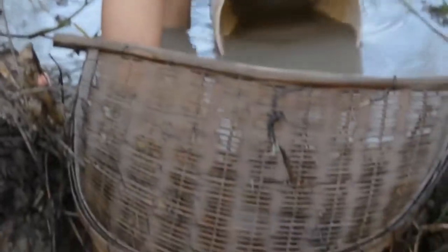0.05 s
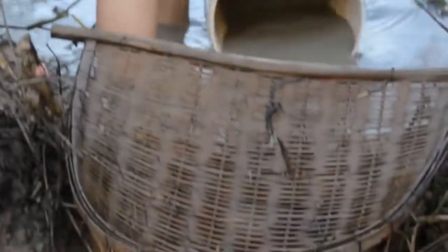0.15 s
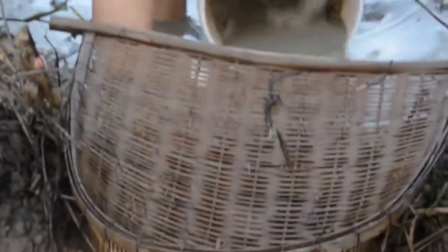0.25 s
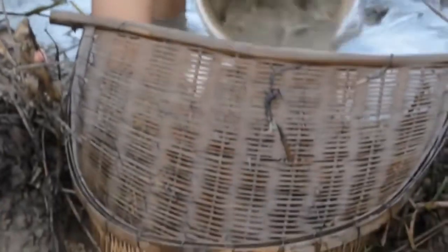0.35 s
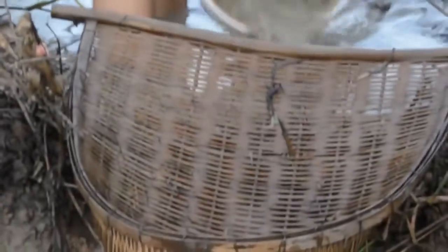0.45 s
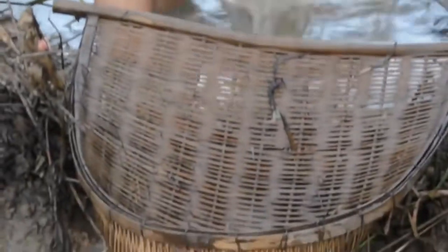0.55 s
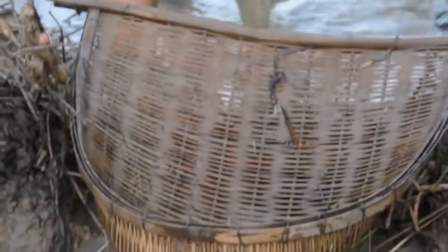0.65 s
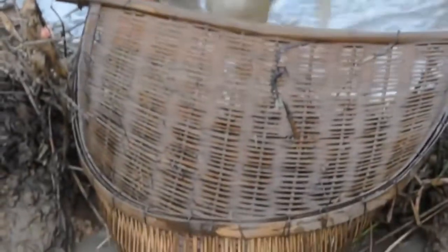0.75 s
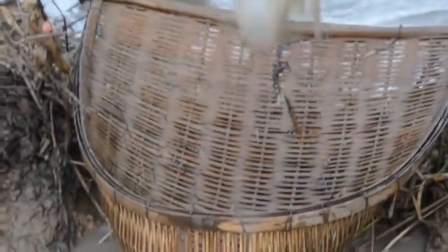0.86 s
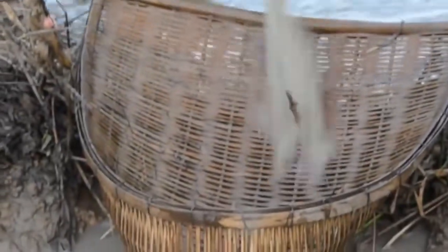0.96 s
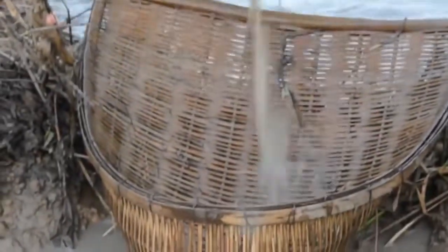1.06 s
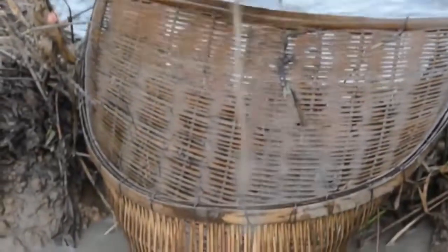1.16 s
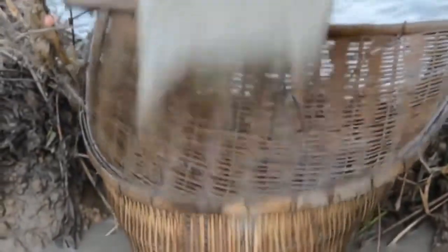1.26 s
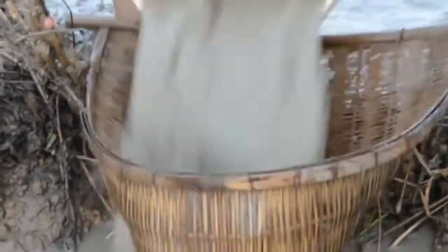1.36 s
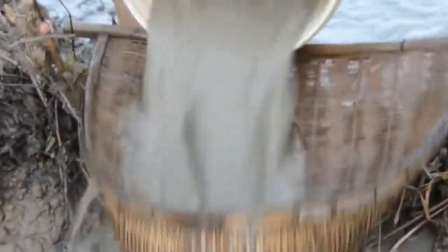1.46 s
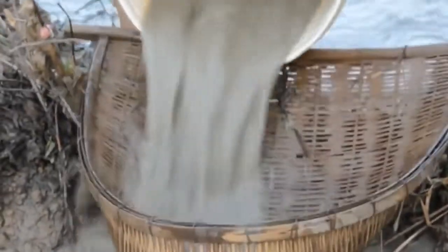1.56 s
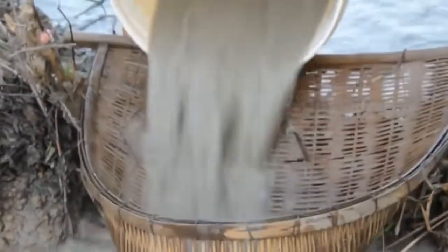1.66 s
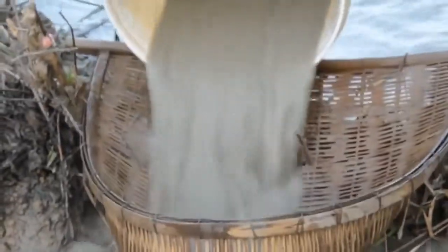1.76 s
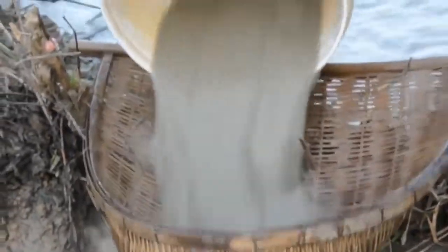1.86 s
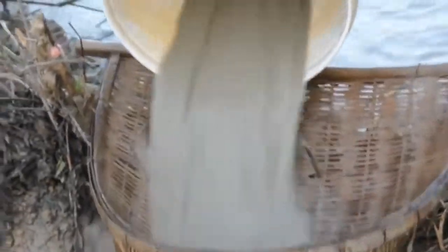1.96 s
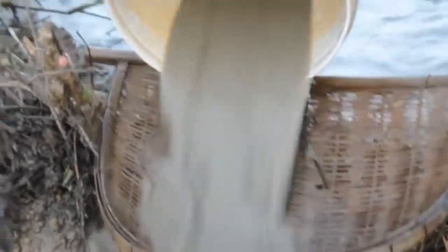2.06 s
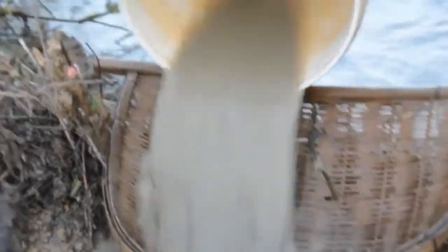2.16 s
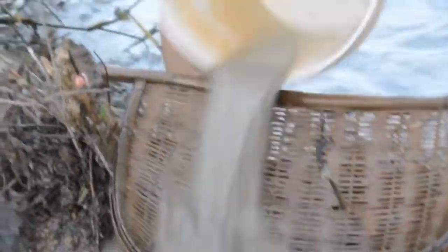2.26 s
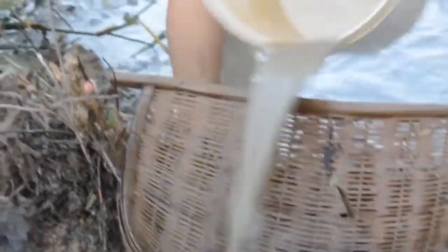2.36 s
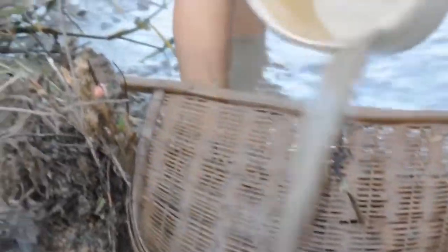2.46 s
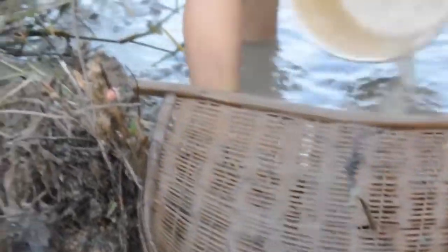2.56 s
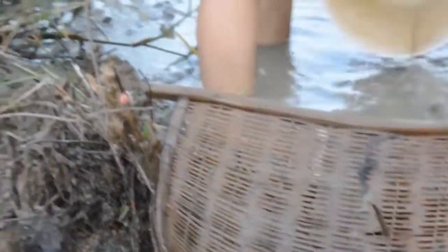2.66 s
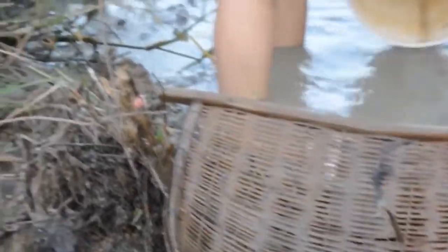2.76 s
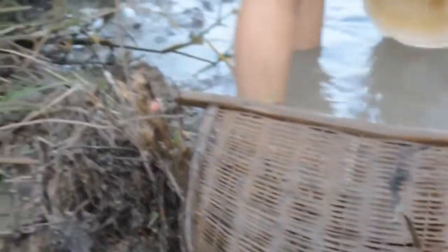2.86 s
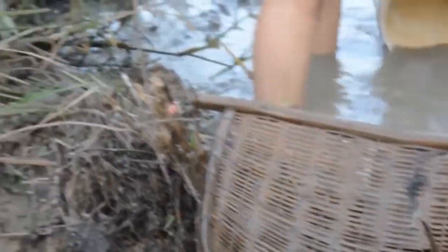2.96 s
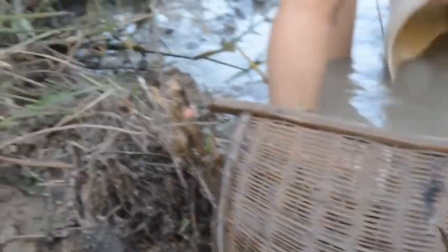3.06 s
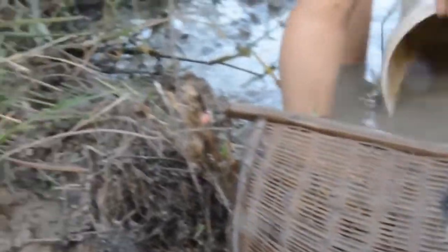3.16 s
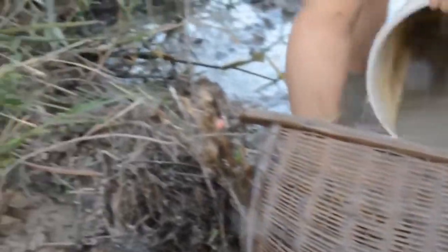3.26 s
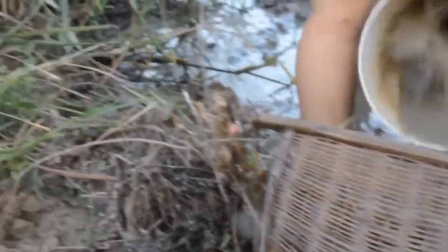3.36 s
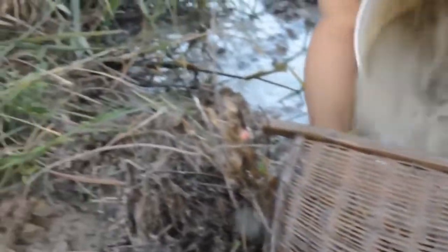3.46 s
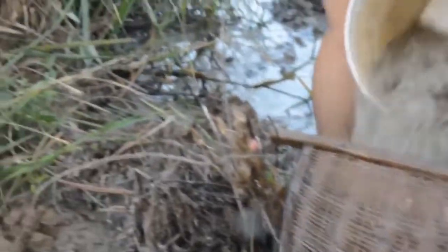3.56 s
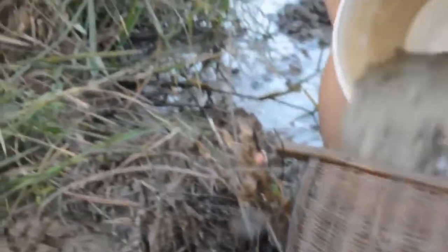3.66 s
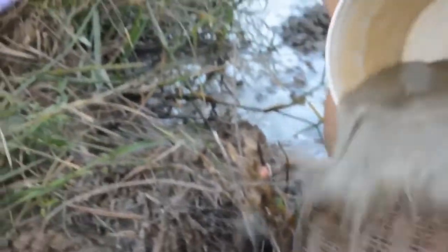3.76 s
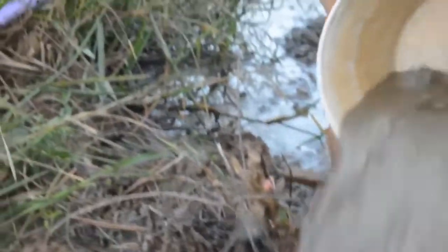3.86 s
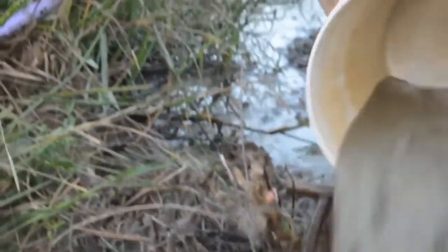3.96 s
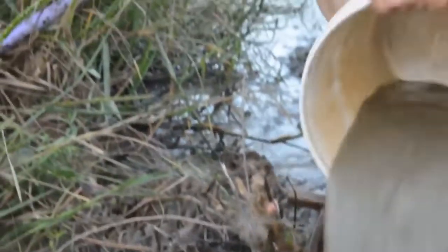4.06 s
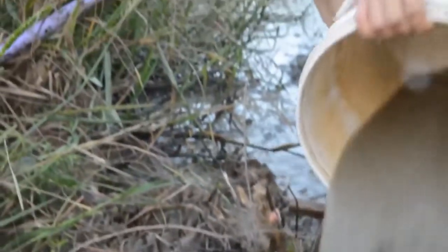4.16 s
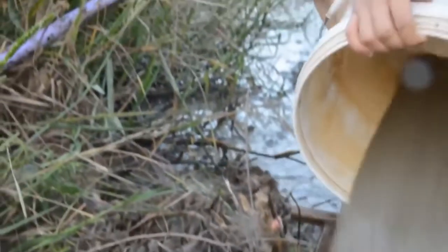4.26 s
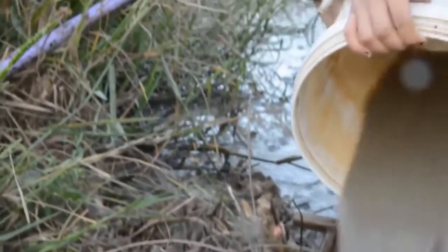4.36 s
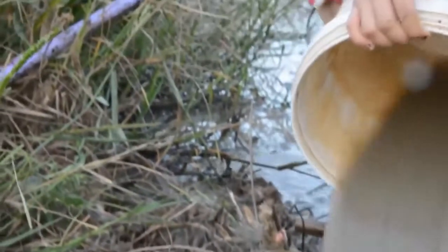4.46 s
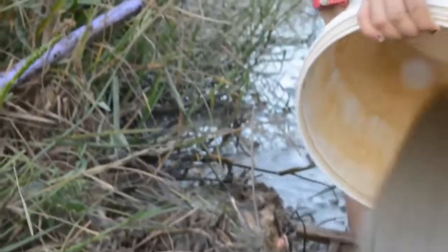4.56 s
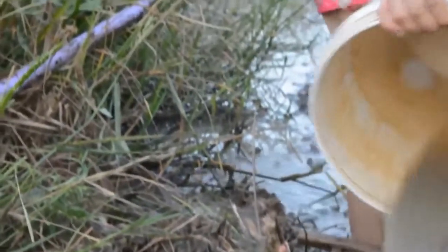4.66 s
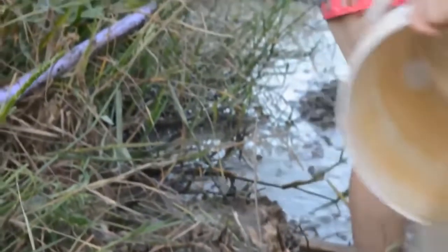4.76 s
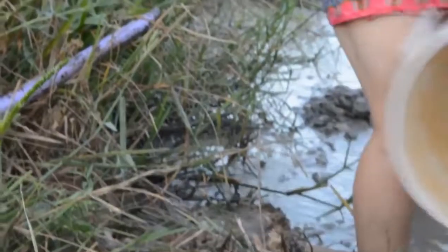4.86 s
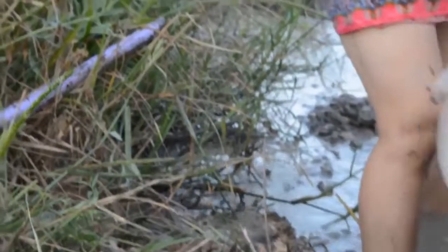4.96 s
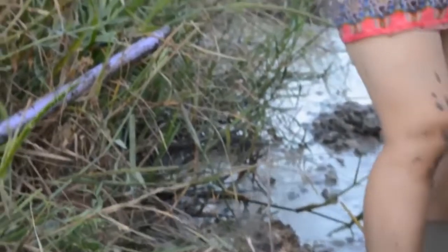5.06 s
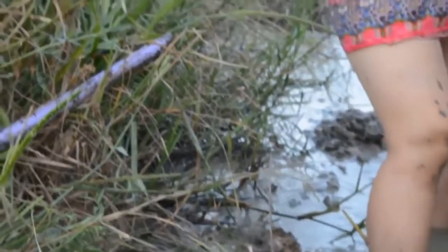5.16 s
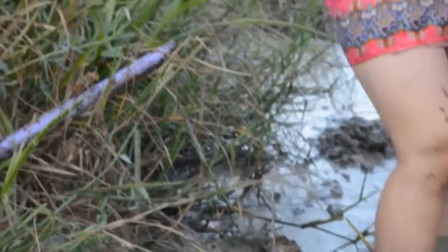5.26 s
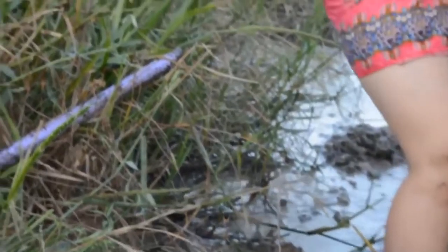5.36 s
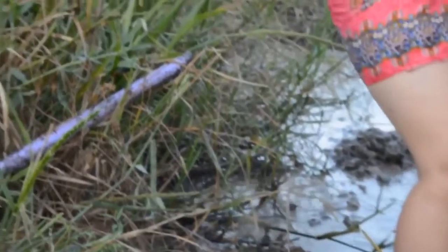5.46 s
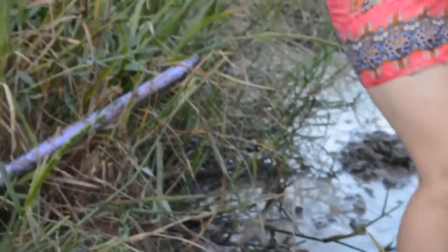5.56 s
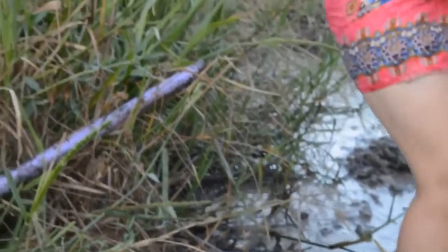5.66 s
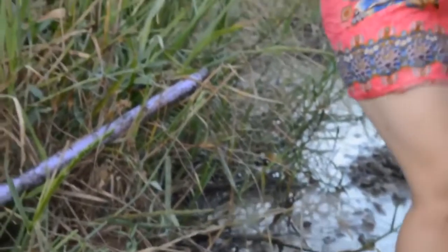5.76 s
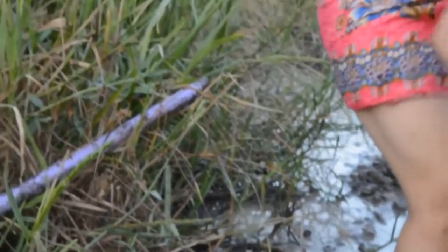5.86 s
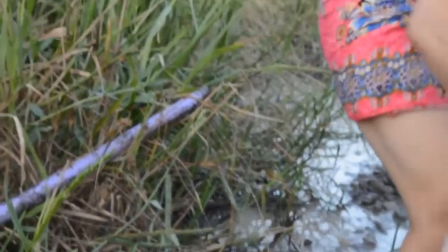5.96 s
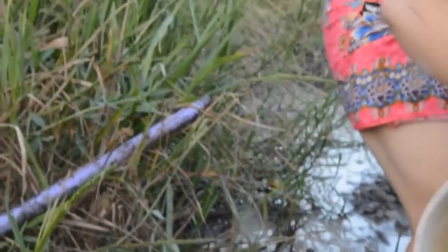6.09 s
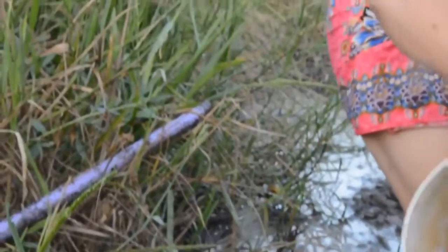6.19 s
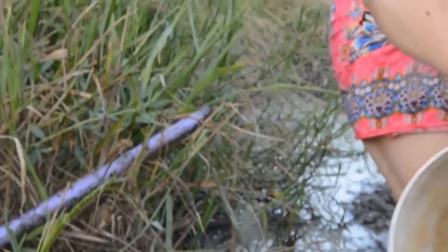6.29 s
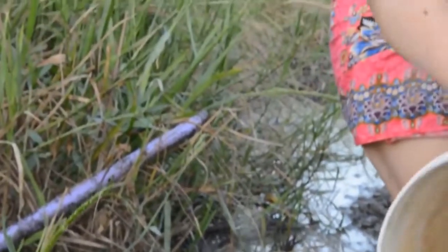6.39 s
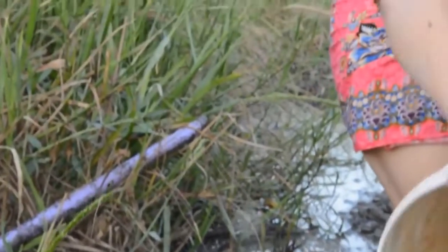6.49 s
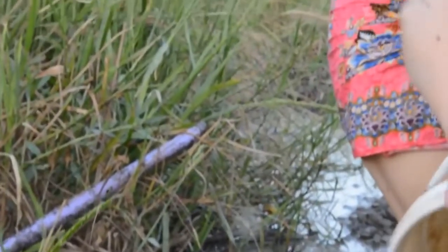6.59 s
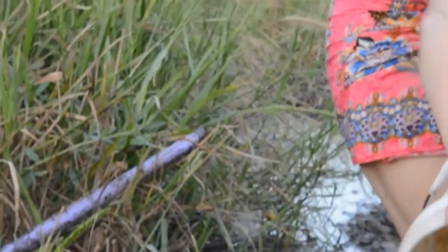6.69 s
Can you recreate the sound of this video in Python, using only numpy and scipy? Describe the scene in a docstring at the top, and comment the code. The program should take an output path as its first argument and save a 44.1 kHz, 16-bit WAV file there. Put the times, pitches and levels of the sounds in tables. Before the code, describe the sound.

Close up outdoors, slightly left of centre, a bucket slaps and sloshes through shallow water, then tips a long splashing gush into a basket. Hollow plastic booms mark the emptying. A second scoop and heavier, bubbling pour follow, draining away to a quiet gap with soft mud steps before sloshing starts again. Thin insect shrilling and faint bird notes sit behind, in dry open air.

```python
"""Bailing a muddy pond

Someone bails a pond with a plastic bucket and pours it through a woven basket, close by and a little to the left.
The water is built from clouds of ringing bubbles over noise: scoops slap and gurgle, pours gush and drain away.
The bucket knocks with a hollow boom, made of fading tones that shift with the water in it.
Insects shrill in the grass, as noise and pure pulses, and a small bird twitters far off in short falling notes."""
import sys
import numpy as np
from scipy import signal
from scipy.fft import rfft, irfft, next_fast_len
from scipy.io import wavfile
from scipy.ndimage import map_coordinates

SR = 44100
rng = np.random.default_rng(int(sys.argv[2]) if len(sys.argv) > 2 else 0)


def log_audio(samples):
    """Write samples as a 16-bit WAV file to the path given in sys.argv[1]."""
    # one column per channel
    frames = np.atleast_2d(samples).T
    # limit to full scale, then quantise
    limited = np.clip(frames, -1, 1)
    pcm = np.round(limited * 32767).astype(np.int16)
    wavfile.write(sys.argv[1], SR, pcm)


N = 296793  # length of the scene in samples


def amp(db):
    """Turn a level in dB into a gain."""
    return 10 ** (np.asarray(db) / 20)


def unit(x):
    """Scale x to an average (rms) level of 1."""
    return x / np.sqrt(np.mean(x ** 2) + 1e-20)


def along(points, hz):
    """Read a curve of (f/Hz, value) points, joined by straight lines on a log pitch axis."""
    f, v = np.transpose(points)
    return np.interp(np.log(hz + 1), np.log(f + 1), v)


def wobble(rate):
    """A smooth random curve with a new random value rate times a second."""
    return map_coordinates(rng.standard_normal(int(N * rate / SR) + 4), [np.arange(N) * rate / SR])


def filtered(x, response):
    """Change the loudness of each pitch in x by a gain that depends on frequency."""
    m = next_fast_len(N + SR // 2)
    gain = response(np.fft.rfftfreq(m, 1 / SR))
    return irfft(rfft(x, m) * gain, m)[..., :N]


def coloured(x, spectrum):
    """Give x a tone colour with a filter of energy 1 that rings only after a click, never before."""
    size = 4096
    level_db = along(spectrum, np.fft.rfftfreq(size, 1 / SR))
    # folding the cepstrum moves all the ringing after the click (minimum phase)
    cepstrum = irfft(np.log(amp(level_db)))
    cepstrum[1:size // 2] *= 2
    cepstrum[size // 2 + 1:] = 0
    ringing = irfft(np.exp(rfft(cepstrum)))
    return signal.fftconvolve(x, ringing / np.linalg.norm(ringing))[:N]


def add(track, s, sound):
    """Mix a sound into a track, starting at s seconds."""
    start = max(round(s * SR), 0)
    part = track[start:start + len(sound)]
    part += sound[:len(part)]


def bubble(t, hz, cycles, rise):
    """A bubble swells over its first cycle and fades 60 dB in some more; its pitch climbs near the surface."""
    age = t * hz / cycles
    swell = 1 - np.exp(-(t * hz) ** 2)
    fade = np.exp(-np.log(1000) * age)
    return np.sin(2 * np.pi * hz * t * (1 + rise * age)) * fade * swell


def bubbles(count, low_hz, high_hz, cycles, scatter_db, size, rise=0.099):
    """A cloud of bubbles of random time, pitch, life and strength, each at most size samples long."""
    when, pitch, life, strength = rng.random((count, 4)).T[:, :, None]
    hz = low_hz * (high_hz / low_hz) ** pitch
    excess = -np.log(1 - .93 * strength)
    tones = bubble(np.arange(size) / SR, hz, cycles * (.5 + life), rise)
    rings = amp(scatter_db * excess) * hz * tones
    places = (when * N).astype(int) + np.arange(size)
    return unit(np.bincount(places.ravel(), rings.ravel(), N)[:N])


def voice(cloud, spectrum, bed_db):
    """Bubbles on a bed of noise, the rush of countless smaller ones, at rms 1."""
    bed = amp(bed_db) * rng.standard_normal(N)
    return unit(coloured(cloud + bed, spectrum))


def surge(s, rise, length, fall):
    """Power that swells up to time s, holds for a length and dies away; rise and fall each span 60 dB."""
    t = np.arange(N) / SR - s
    before, after = np.maximum(-t, 0), np.maximum(t - length, 0)
    return 1e-6 ** (before / rise + after / fall)


def powers(gurgle_db, splash_db, spray_db):
    """Power of the three voices of water, as rows."""
    return amp(np.vstack(np.broadcast_arrays(gurgle_db, splash_db, spray_db))) ** 2


# sloshes round the dipping bucket, before the trims in water():
# (t/s, length/s, splash level/dB, gurgle over splash/dB, spray over splash/dB)
SLOSHES = [(.075, 0.015, -51, -3, 2), (0.358, 0.092, -42.5, -4.5, 2.5), (0.47, 0.044, -34.5, -4.5, -10),
           (0.615, 0.087, -31.5, -9, -1.5), (0.728, 0.069, -33, -0.5, -0.5), (0.86, 0.15, -38, -22, -4.5),
           (2.952, 0.03, -40, -8, 2.5), (3.29, 0.13, -51, 1, -14), (3.468, .07, -37, -1, -1),
           (3.565, 0.068, -39, 7, 0), (5.558, .04, -41.5, 3, -2.5), (5.778, 0.1, -45.5, -3, -10),
           (5.95, 0.1, -35, 0, -0.5), (6.158, 0.08, -36, -5.5, -0.5), (6.232, 0.21, -30.5, -7, -3.5),
           (6.673, 0.023, -24.5, -17.5, -1.5)]
SLOSH_RISE_S, SLOSH_FALL_S = 0.23, 0.58  # time to swell and to die by 60 dB
LAP_DB, LAP_FALL_S = -11.5, 3.3  # the pond laps on after each slosh


def scooping():
    """Each dip of the bucket sloshes, then the pond laps and settles; returns power curves."""
    power = np.zeros((3, N))
    for s, length, db, gurgle_db, spray_db in SLOSHES:
        sloshing = surge(s, SLOSH_RISE_S, length, SLOSH_FALL_S)
        lapping = amp(LAP_DB) ** 2 * surge(s, SLOSH_RISE_S, length, LAP_FALL_S)
        power += powers(db + gurgle_db, db, db + spray_db) * (sloshing + lapping)
    return power


# streams poured into the basket, before thinning and the trims in water(): (t/s, length/s, splash level/dB)
POUR_STREAMS = [(1.783, 0.935, -29), (3.785, 0.12, -28.5), (4.083, 1.015, -28)]
POUR_RISE_S, POUR_FALL_S, POUR_SAG_DB_PER_S = 0.42, 0.63, 4  # the stream thins as the bucket empties
POUR_SPRAY_DB, POUR_GURGLE_DB = -1.5, -2.5  # over the splash
POOL_DB, POOL_S = 8.5, 0.19  # the gurgle starts this much weaker, until a pool has gathered
# gushes, when a mass of water tips out at once, before the trims in water():
# (t/s, rise/s, length/s, fall/s, splash level/dB, gurgle over splash/dB, spray over splash/dB)
GUSHES = [(1.749, 0.13, 0.021, 0.38, -22, -12, -2), (1.78, 0.14, 0.019, 0.22, -29, 3.5, -8),
          (2.837, 0.25, .006, 0.31, -33, -8, 0), (3.806, .15, 0.14, 0.39, -38, 3.5, 1),
          (4.321, 0.1, 0.11, 1.66, -25, -1.5, -2)]
# water hissing through the bare weave, before the trims in water():
# (t/s, rise/s, length/s, fall/s, spray level/dB)
HISSES = [(1.2, 0.54, 0.21, 0.7, -34), (1.673, 0.05, .07, 0.27, -25.5), (5.19, .5, 0.32, .5, -48)]
HISS_SPLASH_DB, HISS_GURGLE_DB = -10, -26  # over the spray


def pouring():
    """Streams gather a pool and slowly thin; gushes ride on them, and water hisses through the weave."""
    power = np.zeros((3, N))
    for s, length, db in POUR_STREAMS:
        age = np.maximum(np.arange(N) / SR - s, 0)
        flow_db = db - POUR_SAG_DB_PER_S * age
        gurgle_db = flow_db + POUR_GURGLE_DB - POOL_DB * np.exp(-age / POOL_S)
        flow = surge(s, POUR_RISE_S, length, POUR_FALL_S)
        power += powers(gurgle_db, flow_db, flow_db + POUR_SPRAY_DB) * flow
    for s, rise, length, fall, db, gurgle_db, spray_db in GUSHES:
        power += powers(db + gurgle_db, db, db + spray_db) * surge(s, rise, length, fall)
    for s, rise, length, fall, db in HISSES:
        power += powers(db + HISS_GURGLE_DB, db + HISS_SPLASH_DB, db) * surge(s, rise, length, fall)
    return power


# tone colours of the three voices of water, also used by slaps(): (f/Hz, relative level/dB)
GURGLE = [(70, -32), (140, -2.5), (300, -8), (680, 4.5), (850, 1.5), (1100, -2), (2000, -83.5)]
SPLASH = [(400, -61.5), (750, -5.5), (950, -1.5), (1500, 1.5), (2500, 0), (3700, -5.5), (4600, -22),
          (8000, -73)]
SPRAY = [(2000, -44.5), (3400, -3), (4200, 1), (6000, -1), (10000, -9.5), (13000, -15.5), (15800, -29.5)]
# tone colour of the slosh round the dipping bucket: (f/Hz, relative level/dB)
SLOSH = [(450, -41), (950, -8), (1550, -4.5), (2300, -4.5), (3700, -7.5), (6500, -46)]
# share of slosh in the splashing, the rest being falling stream (0-1)
DIP_SLOSH, POUR_SLOSH = 0.96, 0.31
STREAM_LUMPS_DB, SLOSH_LUMPS_DB = .85, 1.8  # size of the slower ups and downs in level


def water(scooped, poured):
    """Large bubbles gurgle, small ones splash and droplets spray; the flow's lumps drive all three."""
    power = scooped + poured + 1e-12
    gurgle_db, splash_db, spray_db = 10 * np.log10(power)
    dip = np.clip((DIP_SLOSH * scooped[1] + POUR_SLOSH * poured[1]) / power[1], 0, 1)
    lump_size = np.interp(dip, [POUR_SLOSH, DIP_SLOSH], [STREAM_LUMPS_DB, SLOSH_LUMPS_DB])
    lumps = lump_size * wobble(35) + 0.42 * wobble(220)
    large = bubbles(count=2400, low_hz=193.9, high_hz=1123, cycles=38.0, scatter_db=3.5, size=2000)
    gurgle = voice(large, GURGLE, bed_db=5.0)
    small = bubbles(count=6000, low_hz=750, high_hz=4500, cycles=24, scatter_db=4, size=800)
    stream = voice(small, SPLASH, bed_db=2.5)
    droplets = bubbles(count=9000, low_hz=3260, high_hz=14340, cycles=24, scatter_db=4.5, size=200)
    spray = voice(droplets, SPRAY, bed_db=6.5)
    # the dipping bucket traps fewer, longer-lived bubbles than the falling stream
    trapped = bubbles(count=2600, low_hz=746, high_hz=3804, cycles=54, scatter_db=-1.0, size=1600)
    slosh = voice(trapped, SLOSH, bed_db=8.0)
    # a few bubbles ring on long enough to be heard one by one
    blips = bubbles(count=120, low_hz=850, high_hz=2800, cycles=55, scatter_db=2.5, size=3000)
    splash = unit(np.sqrt(dip) * slosh + np.sqrt(1 - dip) * stream + (.2 + .2 * dip) * blips)
    # only a hard plunge traps the big, deep bubbles, so a weak gurgle loses some of its bass
    deep = filtered(gurgle, lambda hz: 1 / (1 + (hz / 450) ** 6))
    gurgle = gurgle + np.interp(gurgle_db, [-46, -28], [-.35, .3]) * deep
    out = amp(gurgle_db + lumps - 1.5) * gurgle
    out += amp(splash_db + lumps + 0.64) * splash
    out += amp(spray_db + lumps - 0.8) * spray
    return out


# tone colour of deep churn as water folds into the bucket: (f/Hz, relative level/dB)
CHURN = [(130, -29.5), (200, -5), (290, 1.5), (400, -2), (500, -21.5)]
CHURN_DB = -13  # over the gurgle power it is given


def churn(power):
    """Water folding over the sunken rim or plunging into the basket traps large, low bubbles."""
    cloud = bubbles(count=900, low_hz=180, high_hz=430, cycles=17, scatter_db=3, size=3000)
    return amp(CHURN_DB) * np.sqrt(power[0]) * voice(cloud, CHURN, bed_db=-9)


DRIP_DB, DRIP_FOLLOWS = -31, 0.38  # level at a slosh of 0 dB; dB gained for each dB of slosh


def drips(scooped):
    """Water runs off the bucket and drips into the pond in rising blips, which outlast the slosh."""
    cloud = bubbles(count=330, low_hz=520, high_hz=2200, cycles=36, scatter_db=3, size=3000, rise=.2)
    even = unit(filtered(cloud, lambda hz: 1 / np.hypot(1, hz / 700)))
    return amp(DRIP_DB) * scooped[1] ** (DRIP_FOLLOWS / 2) * even


# slaps of bucket and water: (t/s, time to fade 60 dB/s, splash level/dB, brightness/dB)
SLAPS = [(0.0218, 0.019, -16.5, -1.5), (0.069, 0.15, -37, -14), (0.227, 0.026, -30, 10),
         (0.233, 0.056, -28.5, -9), (0.354, 0.021, -16, -2.5), (0.3583, 0.04, -20.5, -3.5),
         (0.486, 0.0051, -17.5, 4.5), (0.491, 0.04, -20.5, -4), (0.768, 0.02, -27, 10.5),
         (1.544, 0.03, -21.5, -13), (1.726, 0.11, -27.5, 8), (2.37, 0.027, -19, -9),
         (2.454, 0.063, -27.5, -15.5), (2.571, 0.083, -29, -16), (2.848, .012, -20, 0.5),
         (2.98, 0.075, -19, -8.5), (2.996, 0.035, -23.5, -9), (3.122, 0.015, -17, 6),
         (3.185, 0.079, -31.5, -11), (3.4399, 0.025, -14.5, -3), (3.49, 0.014, -28.5, 6),
         (3.557, 0.085, -25.5, 4.5), (4.073, 0.044, -31.5, 12), (4.162, 0.035, -19.5, 0.5),
         (4.292, 0.18, -28, 9.5), (4.498, .03, -24, -14), (5.5353, 0.037, -18, -8.5),
         (5.546, 0.11, -25.5, -7), (5.613, 0.08, -28.5, -1), (5.796, 0.083, -33, 0), (5.958, 0.013, -22, 5),
         (6.021, 0.056, -27, 5), (6.2265, 0.019, -24, 9), (6.334, 0.031, -16.5, -5),
         (6.407, 0.025, -24, -1), (6.5391, 0.0096, -12.5, 6.5), (6.607, 0.014, -27, 14.5)]
SLAP_GURGLE_DB, SLAP_SPRAY_DB = -13, -2.5  # over the splash; brightness trades gurgle for spray


def slaps():
    """Each slap builds for a moment, bursts into crackle and quickly dies, the crackle being rough noise."""
    lead = .012  # seconds of build-up
    t = np.arange(SR // 8) / SR - lead
    build = amp(-9) * np.exp(np.minimum(t, 0) / 0.0033)
    out = np.zeros(N)
    for band, spectrum in enumerate([GURGLE, SPLASH, SPRAY]):
        force = np.zeros(N)
        for s, t60, db, bright_db in SLAPS:
            levels = db + SLAP_GURGLE_DB - bright_db, db, db + SLAP_SPRAY_DB + bright_db
            fade = np.exp(-np.log(1000) * t / t60)
            add(force, s - lead, amp(levels[band]) * np.where(t < 0, build, fade))
        crackle = unit(np.sign(rng.standard_normal(N)) * amp(2.3 * wobble(2500)))
        out += coloured(force * crackle, spectrum)
    return out


# single large bubbles: (t/s, level before a 3 dB lift/dB, starting f/Hz)
PLOPS = [(0.546, -17, 2120), (0.648, -14, 1470), (.742, -18, 1310), (.784, -15, 1550), (.802, -17, 570),
         (.821, -16, 2680), (.861, -20.5, 1560), (.961, -23, 1000), (1.053, -26, 980), (1.101, -19, 2600),
         (1.16, -25, 1850), (1.8, -6.5, 704), (1.826, -9, 694), (3.188, -22.5, 770), (3.289, -28, 1580),
         (3.365, -25, 576), (3.556, -11.5, 516), (3.565, -19, 400), (3.572, -16, 200), (3.585, -9, 1300),
         (3.631, -17.5, 425), (3.659, -15, 1500), (3.764, -12, 2330), (4.043, -16, 1060),
         (4.091, -8.5, 1590), (4.175, -11, 1480), (4.33, -18, 125), (4.358, -7, 950), (4.41, -11, 398),
         (4.431, -10, 650), (4.497, -10, 426), (4.499, -20, 252), (4.562, -10, 1096), (4.803, -14.5, 890),
         (5.806, -22.5, 636), (5.973, -19, 795), (6.046, -21, 410), (6.022, -21, 586), (6.076, -20, 593),
         (6.246, -23.5, 570), (6.286, -20, 1420), (6.315, -22, 730), (6.335, -16, 295), (6.38, -23, 420),
         (6.47, -22.5, 235), (6.376, -14.5, 1720), (6.481, -19, 1340), (6.665, -17, 1390)]


def plops():
    """Pockets of trapped air ring out above the splashing, their pitch climbing a little."""
    out, t = np.zeros(N), np.arange(SR // 8) / SR
    for s, db, hz in PLOPS:
        add(out, s, amp(db + 3.0) * bubble(t, hz, cycles=0.65 * np.sqrt(hz), rise=0.07))
    return out


def ring(modes, fill, attack):
    """Fading tones of the bucket: water shrinks its hollow, raising the boom, and loads its wall, lowering it."""
    t = np.arange(SR // 2) / SR
    contrast = 1 - 0.4 * fill  # tones that draw together share the blow more evenly, and beat
    damping = 1 + 0.25 * fill  # a full bucket rings shorter
    tones = np.zeros(len(t))
    for empty_hz, full_hz, db, t60 in modes:
        hz = empty_hz + fill * (full_hz - empty_hz)
        tones += amp(contrast * db - 60 * t * damping / t60) * np.sin(2 * np.pi * hz * t)
    return tones * (1 - np.exp(-t / attack))


# knocks on the bucket: (t/s, boom level/dB, wall level/dB, fill from 0 to 1)
KNOCKS = [(.367, -22.5, -43, 0.37), (1.545, -31, -4.5, 1), (1.5605, -15.5, -53, 0.98),
          (2.245, -23, -34, 0.03), (2.294, -12.5, -15, 0.01), (2.569, -14.5, -31, 0.02),
          (2.995, -17.5, -9, 0.05), (5.545, -19.5, -7, 0.05), (5.616, -29, -42, 0)]
# hollow booms of the bucket: (empty f/Hz, full f/Hz, level when empty/dB, time to fade 60 dB when empty/s)
BOOMS = [(135, 199, 0, .23), (137, 162, -17, .6), (229, 237, -10, .22)]
# rings of its wall: (empty f/Hz, full f/Hz, level when empty/dB, time to fade 60 dB when empty/s)
WALL = [(810, 650, -17, 0.19), (1010, 910, 3.5, 0.02), (2110, 1180, -15, 0.025)]
# soft steps in the mud: (t/s, level/dB, f/Hz)
STEPS = [(5.241, -29, 81), (5.734, -20, 84)]
FLUTTER_DB = 1.2  # size of the random unevenness in level


def thuds():
    """The bucket bumps and booms, and feet thump in the mud as low tones; the level of all of it flutters
    quickly."""
    out, t = np.zeros(N), np.arange(SR // 2) / SR
    for s, boom_db, wall_db, fill in KNOCKS:
        boom = amp(boom_db) * ring(BOOMS, fill, attack=0.0034)
        # the fuller the bucket, the faster its wall falls silent
        wall = amp(wall_db - 420 * fill * t) * ring(WALL, fill, attack=0.0025)
        add(out, s, boom + wall)
    for s, db, hz in STEPS:
        add(out, s, amp(db) * bubble(t, hz, cycles=14.3, rise=0))
    return out * amp(FLUTTER_DB * wobble(170))


def banks(x, t60):
    """A brief scatter off the mud banks and the basket: x smeared by noise that fades 60 dB in t60 seconds."""
    t = np.arange(SR // 4) / SR
    tail = rng.standard_normal(len(t)) * amp(-60 * t / t60)
    return signal.fftconvolve(x, tail / np.linalg.norm(tail))[:N]


# near insects: (f/Hz, pulses a second, average level before the swell/dB)
SINGERS = [(7870, 22, -46.5), (7500, 6, -54.5)]
# swell of the near insects: (t/s, level/dB)
SINGER_SWELL = [(4.5, -1), (5.2, 5), (5.9, 6), (6.4, -1)]
SINGER_PULSE_S, SINGER_SAG_HZ = 0.028, 110  # the pitch droops this far through each pulse


def singers():
    """A few nearer insects give short, pure pulses at uneven intervals."""
    out = np.zeros(N)
    u = np.linspace(0, 1, int(SINGER_PULSE_S * SR))
    for hz, rate, db in SINGERS:
        track = np.zeros(N)
        pitch = hz + SINGER_SAG_HZ * (1 / 3 - u ** 2)
        pulse = np.sin(np.pi * u) * np.sin(2 * np.pi * np.cumsum(pitch) / SR)
        for k, (late, strength) in enumerate(rng.random((100, 2))):
            add(track, (k + .8 * late) / rate, amp(7 * strength) * pulse)
        out += amp(db) * unit(track)
    return out * amp(np.interp(np.arange(N) / SR, *np.transpose(SINGER_SWELL)))


# bird phrases: (t/s, length/s, note level before the flutter/dB)
PHRASES = [(0.14, .06, -40), (0.384, .02, -35), (0.56, .06, -35), (0.975, .06, -34), (5.348, .02, -43),
           (5.515, .06, -39), (5.688, .1, -39.5), (5.898, .02, -43)]
# spells of faint twittering: (t/s, length/s)
BOUTS = [(0.051, 0.94), (5.241, .7)]
NOTE_S, NOTE_GAP_S = 0.0236, .039  # length of a note; time from one note to the next
NOTE_HZ, NOTE_FALL_HZ = 5060, 680  # typical starting pitch and how far it falls
TWITTER_DB, TWITTER_HZ = -48, 4820  # level before the flutter and typical starting pitch


def bird():
    """Short notes that bend downwards, with fainter, lower ones twittering between them."""
    out, u = np.zeros(N), np.linspace(0, 1, int(NOTE_S * SR))
    notes = []
    for s, length, db in PHRASES:
        notes += [(s + delay, db, NOTE_HZ) for delay in np.arange(0, length, NOTE_GAP_S)]
    for s, length in BOUTS:
        notes += [(s + length * place, TWITTER_DB, TWITTER_HZ) for place in rng.random(size=18)]
    for s, db, top_hz in notes:
        hz = top_hz - NOTE_FALL_HZ * u ** 1.38 + 45 * rng.standard_normal()
        add(out, s, amp(db) * np.sin(np.pi * u ** 0.75) * np.sin(2 * np.pi * np.cumsum(hz) / SR))
    flutter = amp(1.4 * wobble(450) - 1)
    return out * flutter + amp(-5) * banks(out, t60=0.092)


# tone colour of the insect chorus: (f/Hz, relative level/dB)
SHRILL = [(6900, -48), (7380, -6), (7650, 0.5), (7930, 3.5), (8100, 0), (8330, -4), (8900, -46)]


def insects():
    """A fluttering chorus of shrill insects far off, made of noise in a narrow band."""
    noise = filtered(rng.standard_normal(N), lambda hz: amp(along(SHRILL, hz)))
    return amp(-45.5) * unit(noise * amp(1.8 * wobble(70)))


# tone colour of the distant rumble and air: (f/Hz, relative level/dB)
RUMBLE = [(40, -7), (62, 1.5), (72, -3), (82, 9), (95, -4.5), (130, -3), (170, -10), (300, -15),
          (700, -28.5), (3000, -19.5), (12000, -25.5)]


def rumble():
    """The low murmur of open country, made of steady noise."""
    return amp(-45.0) * unit(filtered(rng.standard_normal(N), lambda hz: amp(along(RUMBLE, hz))))


# how far the middle sound leans left: (f/Hz, left over right level/dB)
LEAN = [(60, 4.5), (200, 8.5), (700, 12), (1290, 7), (3000, 5), (8100, 3.5), (13000, -1.5)]
# spread of the water: (f/Hz, side over middle level/dB)
WIDTH = [(200, -17), (650, -23), (1300, -15), (6000, -13), (10000, -7.5), (15000, 1)]
DIP_CHURN_DB = 2  # the dipping bucket churns more than the stream


def scene():
    """Near sounds share both ears; stray droplets and the far sounds give the width."""
    blows = slaps() + plops()
    scooped, poured = scooping(), pouring()
    churning = churn(amp(DIP_CHURN_DB) ** 2 * scooped + poured)
    near = water(scooped, poured) + churning + drips(scooped) + thuds() + blows
    far = insects() + singers() + bird() + rumble()
    mid = near + amp(-9) * banks(blows, t60=0.17) + far
    # fresh random draws make the side sound independent of the middle
    scatter = filtered(water(scooped, poured) + slaps(), lambda hz: amp(along(WIDTH, hz)))
    side = scatter + amp(-1.5) * insects() + amp(-1.0) * singers() + amp(-4.0) * rumble()

    def right_share(hz):
        """Gain of the right ear; both gains add up to 2."""
        return 2 / (1 + amp(along(LEAN, hz)))

    left = filtered(mid, lambda hz: 2 - right_share(hz)) + side
    right = filtered(mid, right_share) - side
    return np.array([left, right])


TOP_HZ = 15800  # nothing is heard from here up


def record(dry):
    """Keep only the pitches below the top frequency."""
    return filtered(dry, lambda hz: hz < TOP_HZ)


dry = scene()
out = record(dry)
log_audio(out)
```